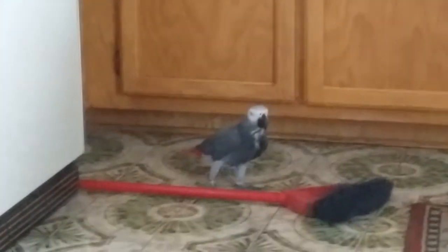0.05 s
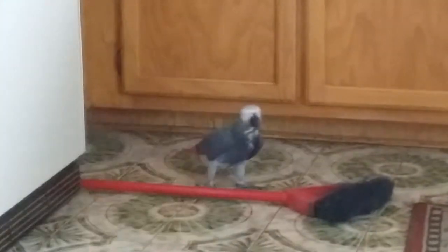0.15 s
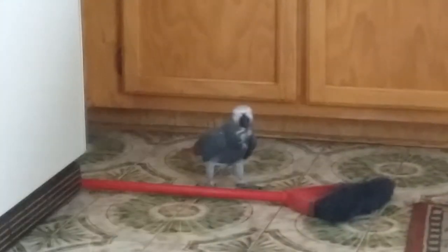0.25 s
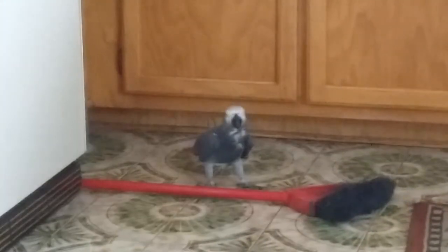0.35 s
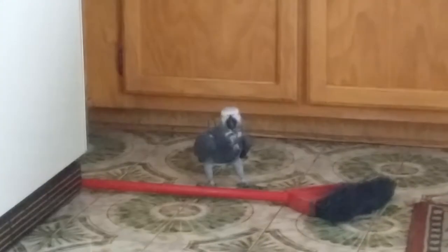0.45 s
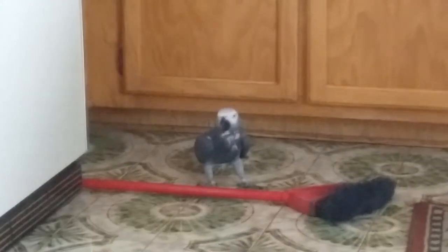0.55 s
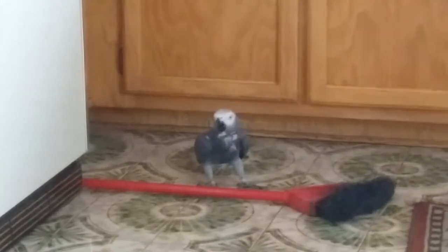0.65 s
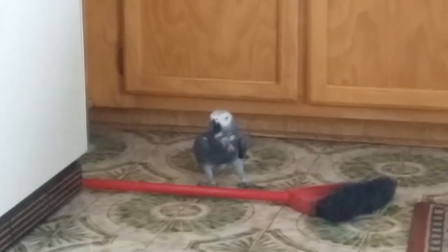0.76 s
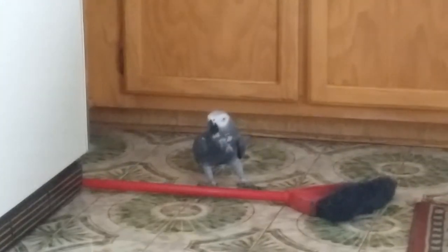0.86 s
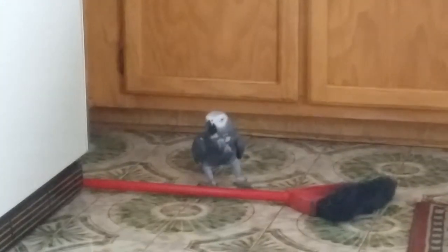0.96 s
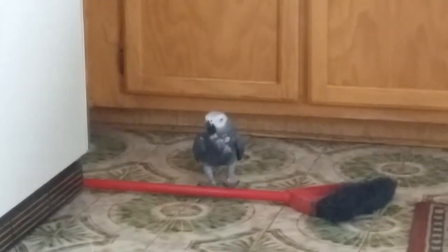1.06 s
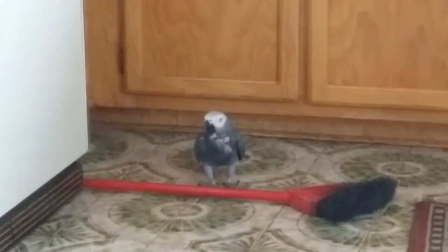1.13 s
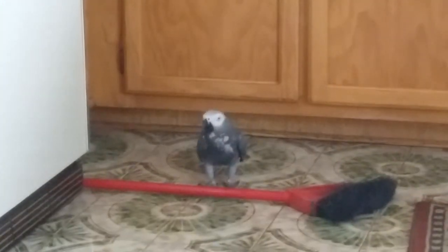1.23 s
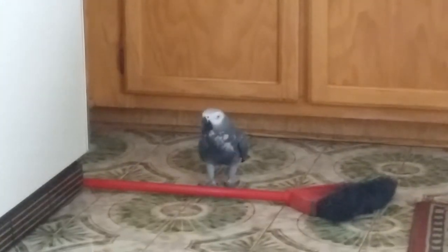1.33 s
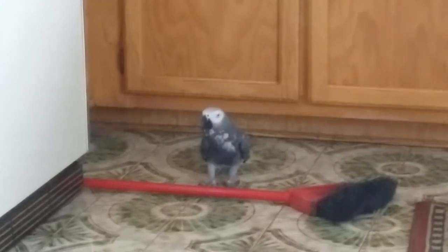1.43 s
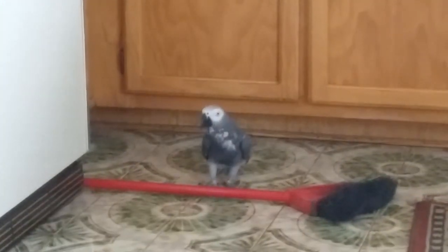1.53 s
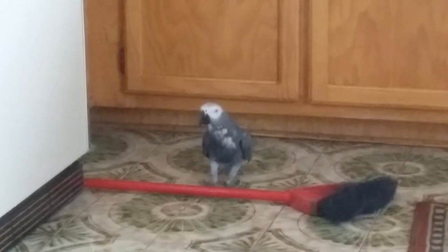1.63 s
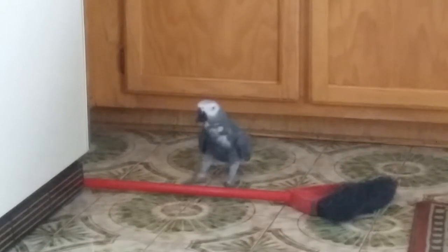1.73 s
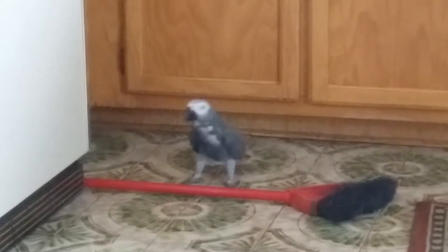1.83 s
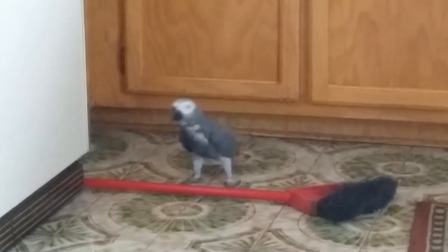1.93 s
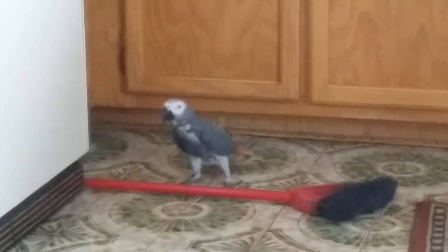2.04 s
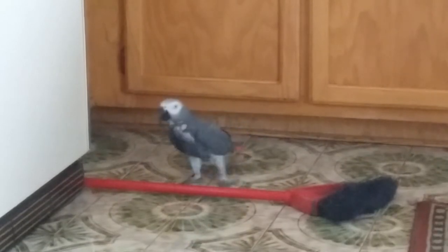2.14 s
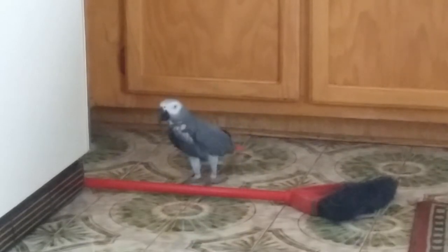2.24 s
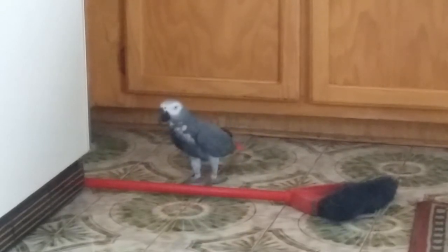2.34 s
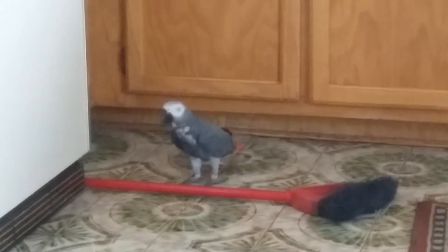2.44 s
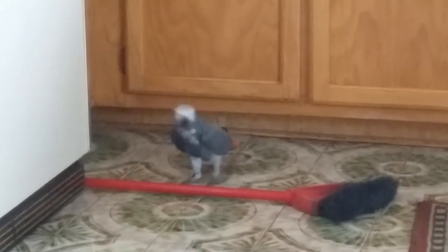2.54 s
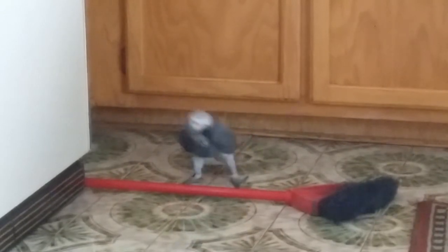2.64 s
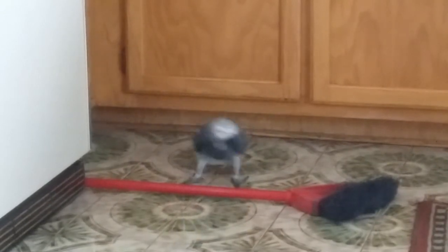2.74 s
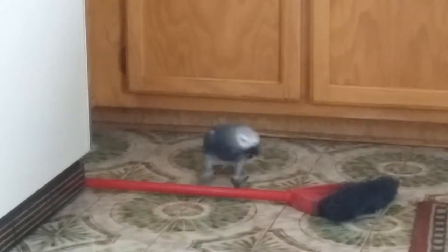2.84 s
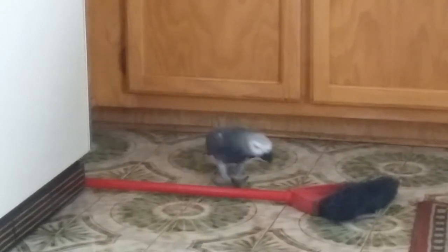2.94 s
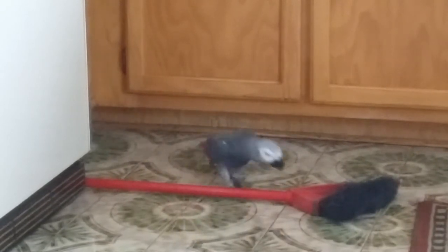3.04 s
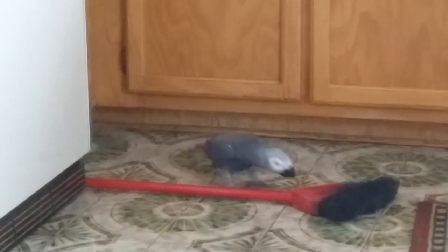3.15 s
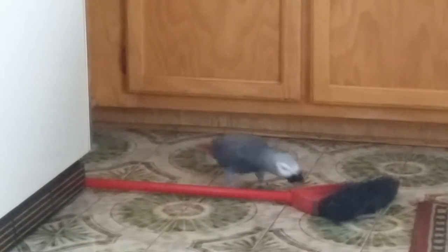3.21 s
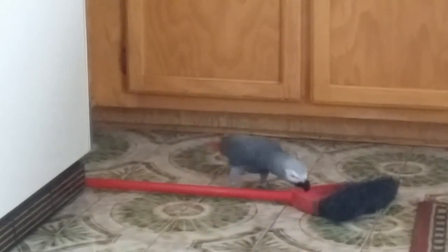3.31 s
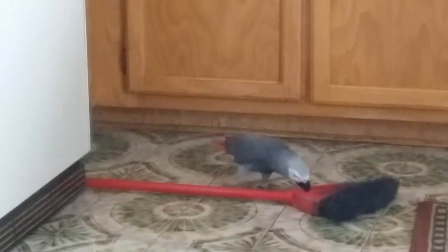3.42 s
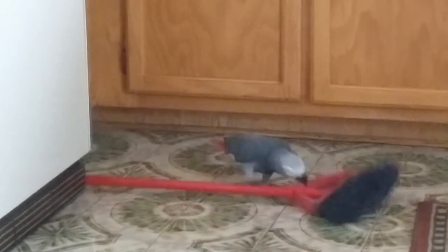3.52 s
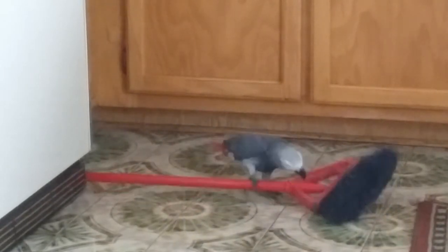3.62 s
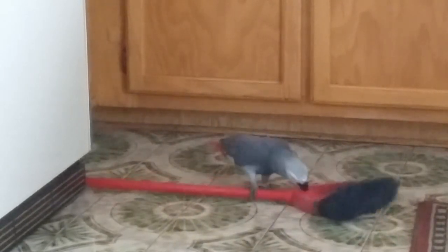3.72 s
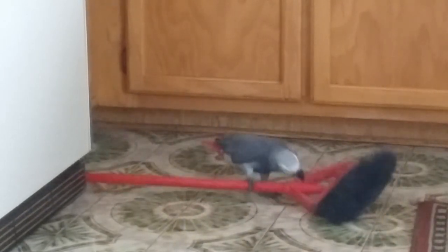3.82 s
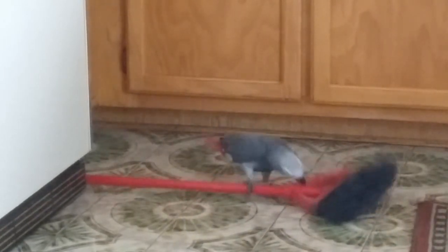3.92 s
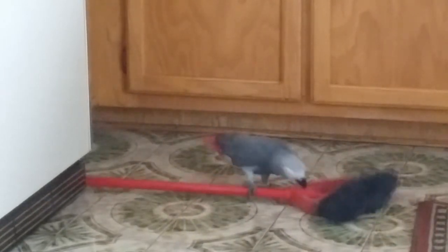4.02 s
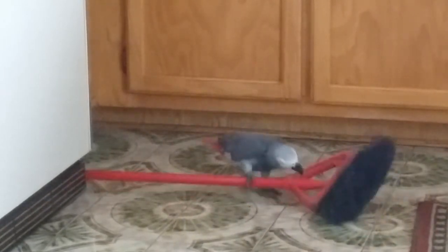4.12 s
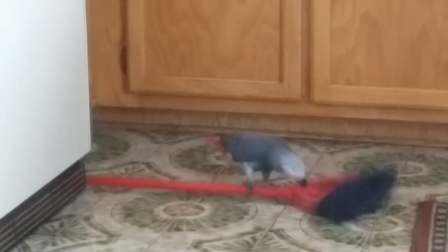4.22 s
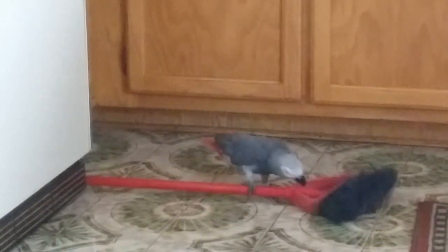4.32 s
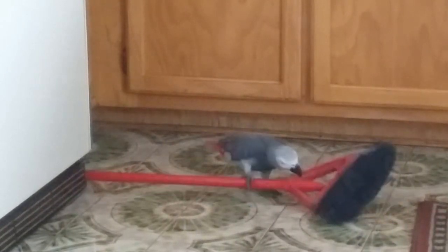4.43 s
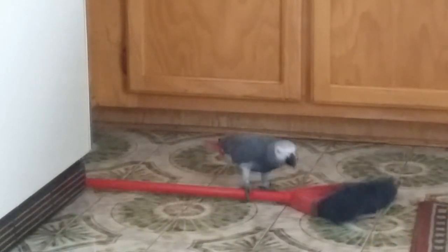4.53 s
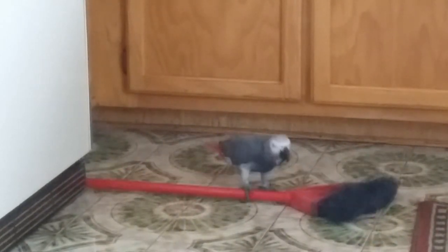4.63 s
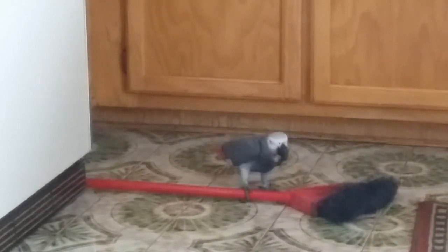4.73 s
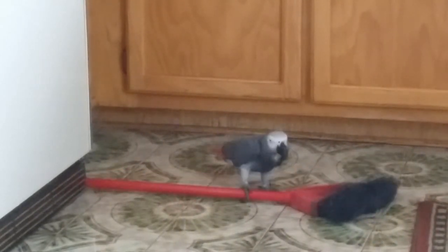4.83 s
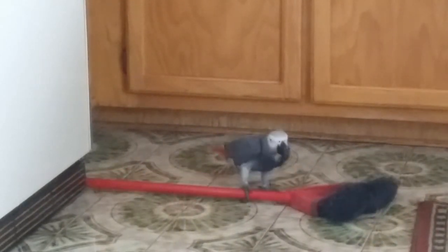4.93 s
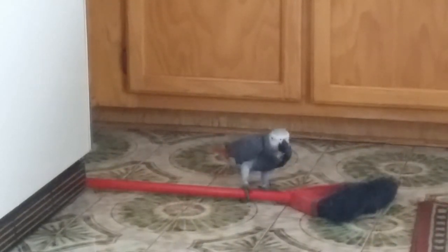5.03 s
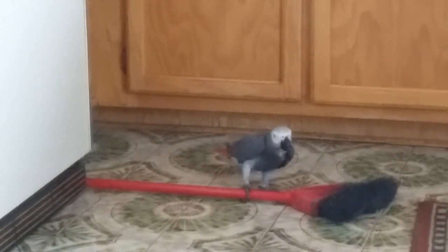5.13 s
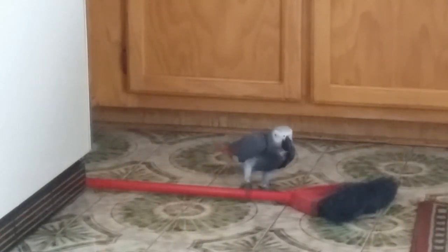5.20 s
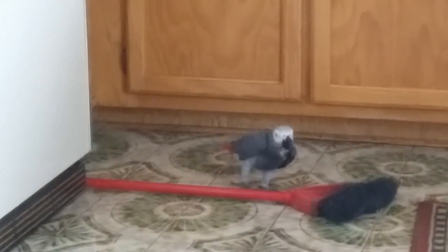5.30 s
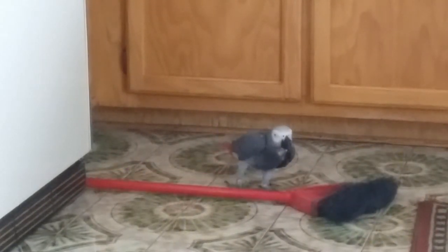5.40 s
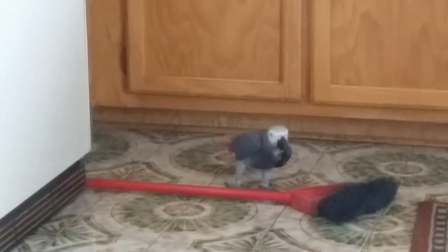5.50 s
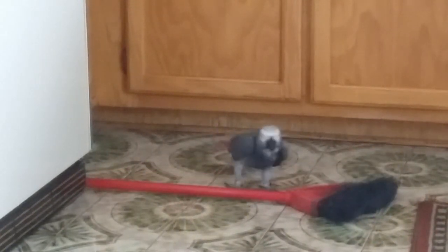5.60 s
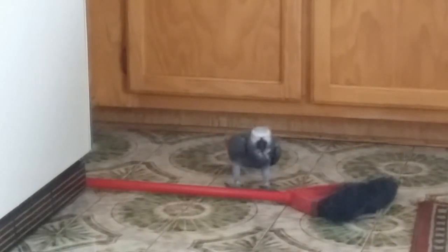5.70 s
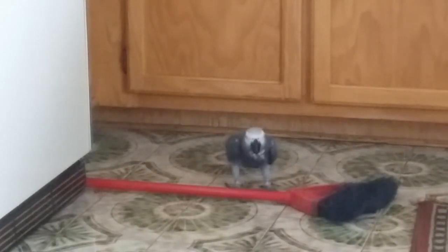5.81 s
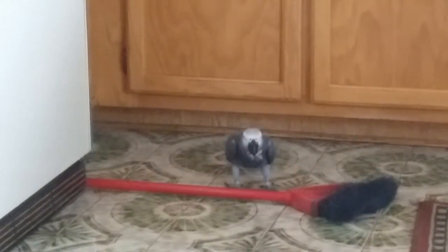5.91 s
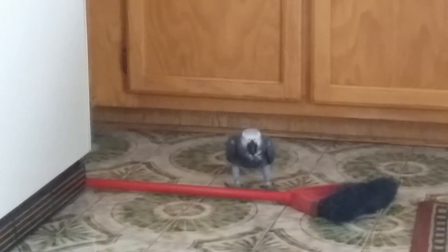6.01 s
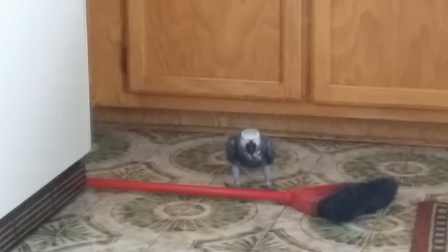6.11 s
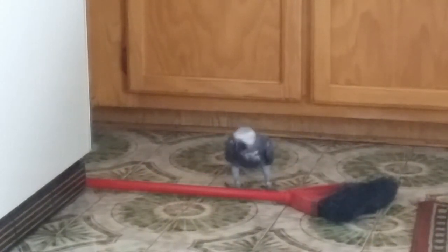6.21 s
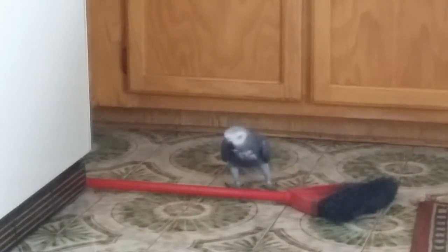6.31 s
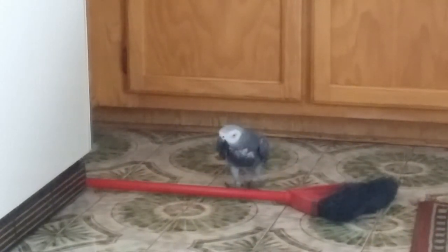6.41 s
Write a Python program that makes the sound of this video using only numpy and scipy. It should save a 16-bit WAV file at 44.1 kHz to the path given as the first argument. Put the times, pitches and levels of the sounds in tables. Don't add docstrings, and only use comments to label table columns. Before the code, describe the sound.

A refrigerator hums in an echoing kitchen while faint crockery clinks, then a parrot's beak raps five sharp, increasingly bright knocks on a broom.

```python
import sys
import numpy as np
from scipy import signal
from scipy.fft import rfft, irfft
from scipy.io import wavfile

SR = 44100
rng = np.random.default_rng(int(sys.argv[2]) if len(sys.argv) > 2 else 0)


def master_out(mix):
    frames = np.transpose(np.atleast_2d(mix))
    ceiling = np.clip(frames, -1, 1)
    pcm = np.round(ceiling * 32767).astype(np.int16)
    wavfile.write(sys.argv[1], SR, pcm)


def level_to_linear(level):
    exponent = np.asarray(level, float) / 20
    return 10 ** exponent


N = 284797

# f/Hz, level/dB per Hz
HUM = [(24, -73), (40, -17), (82, -8.5), (123, -4), (251, -4), (334, -5), (496, -16), (735, -10),
       (1040, -19.5), (1500, -20.5), (1950, -27), (3300, -120)]
# f/Hz, width/Hz, level/dB
HUM_TONES = [(118.7, 6.7, -48), (183.2, 18, -43.5), (282.6, 12, -54), (409.6, 23, -50.5)]
# f/Hz, level/dB per Hz
HISS = [(500, 5), (1200, 0), (2000, 5), (4200, -7), (6000, -6), (8000, -12.5), (11000, -10.5),
        (14500, -8.5), (16000, -54)]
# f/Hz, width/Hz, level/dB
PORT = [(6017, 847, 20), (5430, 2550, 6)]
# f/Hz, t60/s
ROOM_T60 = [(150, 0.8), (400, 0.89), (800, 0.78), (2000, 0.79), (5500, 0.81), (10000, 0.57)]
# delay/s, level/dB
EARLY = [(.0063, 15.5), (0.0192, 9), (0.0246, 9.5), (0.0271, 3), (.051, 10)]
# t/s, level/dB, centre f/Hz, length/s
CLACKS = [(1.208, -35, 7000, 0.0031), (1.335, -38.5, 5000, .006), (1.3355, -36.5, 2000, .002),
          (1.698, -38, 4900, .015), (1.941, -30.5, 6700, 0.0073), (2.0405, -18.5, 6200, 0.0028),
          (2.0424, -25.5, 2100, 0.0015), (2.0424, -19.5, 9600, 0.0021), (2.4125, -29, 8550, 0.0018),
          (2.4125, -36, 3000, 0.0014), (2.668, -29.5, 11400, .008), (2.887, -35.5, 3000, 0.0026),
          (3.609, -30, 3830, 0.049), (3.6315, -22.5, 5960, 0.0016), (3.632, -27.5, 1720, 0.0023)]
# t/s, level/dB, centre f/Hz
CHINKS = [
    (2.586, -45.5, 4670),
    (2.669, -48.5, 6360),
    (4.2, -39, 5940),
]
# f/Hz, level/dB, t60/s
BOWL = [(1548, 1.5, 0.063), (2780, -5.5, 0.037), (3213, -4.5, 0.16), (4390, -7, 0.063), (4740, -10, 0.067)]
PLATE = [(1480, -1, 0.085), (2294, -8, 0.066), (3110, -1.5, 0.035), (4630, -7, 0.024), (5000, -6.5, .045),
         (5770, -5, 0.035), (11000, -12.5, .05), (12100, -7, .05)]
CUP = [(1294, 0.5, 0.03)]
SPOON = [(12270, 0, 0.033)]
HANDLE = [(548, -1.5, 0.1), (665, 1.5, 0.026), (1380, -5, 0.011), (2470, -14, 0.017)]
JAR = [(1377, -1.5, 0.023), (3120, -9, .04), (4540, -0.5, 0.017), (5000, 0.5, .018), (7300, -6.5, 0.016),
       (11300, -10, 0.058), (12400, -11, .022)]
GLASS = [(3120, 0.0049, .012)]
ROD = [(2470, -2, 0.024), (3000, -0.46, 0.055), (3600, -3.1, 0.024), (4304, -3.4, 0.039)]
# t/s, thing
# struck, level/dB, share of the free ring time
STRIKES = [(1.335, SPOON, -65.5, 1.1), (1.61, CUP, -61, 0.74), (1.7046, BOWL, -59, 0.71),
           (1.9271, PLATE, -56.5, 0.41), (2.0424, JAR, -49.5, 0.76), (2.8904, GLASS, -59, 0.83),
           (2.8912, CUP, -60.5, .95), (3.635, HANDLE, -48.5, 0.85), (3.608, ROD, -63, .9),
           (3.632, ROD, -51.5, 0.41), (3.823, ROD, -45.5, 0.72), (4.079, ROD, -54.5, .9)]
# t/s, peak level/dB
TICKS = [(0.021, -24), (0.0357, -26), (0.0804, -30.5), (0.0899, -31), (0.1217, -31), (0.1425, -32),
         (0.1714, -18.5), (0.463, -20.5), (0.4656, -22), (0.4694, -23), (0.4766, -27)]
# t/s, contact f/Hz, crack level/dB, ring into the room level/dB, hollow body level/dB
KNOCKS = [
    (3.6247, 545, -28, -33, -58),
    (3.816, 890, -20, -16.5, -71),
    (4.0728, 1216, -21, -14, -51),
    (4.3558, 2210, -15.5, -15.5, -73),
    (4.6258, 2570, -14.5, -16, -80),
]
# f/Hz, level/dB, t60/s
BODY = [(224.5, 3.5, 0.13), (278, -24, 0.034), (480, -32, 0.036), (539, -7, 0.38), (746, -16, 0.029)]
# f/Hz, level/dB, t60/s
SHELL = [(963, 1, 0.015), (1670, -1, 0.013), (2210, 8.5, 0.0045), (2930, 4, 0.0073), (3570, -5.5, 0.0088),
         (4350, -17, 0.011)]


def rms_one(x):
    return x / np.sqrt(np.mean(x ** 2) + 1e-20)


def at_hz(points, hz):
    table_hz, values = np.array(points).T
    return np.interp(np.log(hz + 1), np.log(table_hz), values)


def resonance(x, hz, width_hz):
    r = np.exp(-np.pi * width_hz / SR)
    zeros = [(1 - r * r) / 2, 0, (r * r - 1) / 2]
    poles = [1, -2 * r * np.cos(2 * np.pi * hz / SR), r * r]
    return signal.lfilter(zeros, poles, x)


def low_pass(x, hz):
    return signal.lfilter(*signal.butter(2, min(hz, 18000), fs=SR), x)


def butter_filter(x, order, hz, kind):
    return signal.sosfilt(signal.butter(order, hz, kind, fs=SR, output="sos"), x)


def ringing(hz, t60):
    t = np.arange(int(t60 * SR * 1.2)) / SR
    return np.sin(2 * np.pi * hz * t) * level_to_linear(-60 * t / t60)


def click():
    return np.eye(1, 200)[0]


def burst(length_s):
    t = np.arange(1200) / SR
    puff = rng.standard_normal(len(t)) * level_to_linear(-40 * t / length_s)
    return puff / np.sqrt(np.sum(puff ** 2))


def add(track, s, sound):
    i = round(s * SR)
    track[i:i + len(sound)] += sound[:N - i]


def coloured(spectrum):
    hz = np.fft.rfftfreq(N, 1 / SR)
    white = rfft(rng.standard_normal(N))
    return rms_one(irfft(white * level_to_linear(at_hz(spectrum, hz)), N))


def room(x, tail_db, fill_s, gap_s, lasting):
    t = np.arange(SR) / SR
    white = rng.standard_normal((2, SR))
    edges = 70 * 2 ** np.arange(0, 8.1, .5)
    tail = 0
    for k, (low, high) in enumerate(zip(edges, edges[1:])):
        band = butter_filter(white[k % 2], 2, [low, high], "band")
        t60 = lasting * at_hz(ROOM_T60, np.sqrt(low * high))
        tail = tail + band * level_to_linear(-60 * t / t60)
    tail = tail * (1 - np.exp(-np.maximum(t - gap_s, 0) / fill_s))
    return level_to_linear(tail_db) * signal.fftconvolve(x, tail)[:N]


def hiss():
    return level_to_linear(-51.5) * coloured(HISS)


def refrigerator():
    out = level_to_linear(-42.35) * coloured(HUM)
    for hz, width_hz, level_db in HUM_TONES:
        out += level_to_linear(level_db) * rms_one(resonance(rng.standard_normal(N), hz, width_hz))
    return out


def crockery():
    touch = np.zeros(N)
    scrapes = [(s, level_db, hz, 1.16 * hz, length_s) for s, level_db, hz, length_s in CLACKS]
    scrapes += [(s, level_db, hz, 0.22 * hz, 0.01) for s, level_db, hz in CHINKS]
    for s, level_db, hz, width_hz, length_s in scrapes:
        scrape = resonance(resonance(burst(length_s), hz, width_hz), hz, width_hz)
        add(touch, s, level_to_linear(level_db) * scrape * SR / width_hz / 4)
    for s, dish, strike_db, damping in STRIKES:
        for hz, level_db, t60 in dish:
            cluster = hz * (1 + 0.0098 * rng.standard_normal(4))
            ring = sum(ringing(mode_hz, t60 * damping) for mode_hz in cluster)
            add(touch, s, level_to_linear(strike_db + level_db) * ring)
    out = level_to_linear(6.5) * touch + room(touch, tail_db=-12.5, fill_s=0.0047, gap_s=0.00053, lasting=0.81)
    add(out, .0062, level_to_linear(6) * touch)
    return out


def ticks():
    out = np.zeros(N)
    for s, peak_db in TICKS:
        add(out, s, level_to_linear(peak_db + 4.5) * low_pass(click(), 9000))
    return out - low_pass(out, 1600)


def knocks():
    contact, blows, body = np.zeros(N), np.zeros(N), np.zeros(N)
    contact_over_db = 13.5
    for s, hz, crack_db, ring_db, body_db in KNOCKS:
        dull = ringing(hz, .0065)
        dull = dull * np.minimum(np.arange(len(dull)) / 20, 1)
        add(contact, s, level_to_linear(contact_over_db) * np.hypot(level_to_linear(crack_db), level_to_linear(ring_db)) * dull)
        add(blows, s, level_to_linear(ring_db) * ringing(hz, 0.0013))
        add(blows, s, level_to_linear(crack_db) * low_pass(click(), 5200))
        for mode_hz, mode_db, t60 in SHELL:
            add(blows, s, level_to_linear(crack_db - 30 + mode_db + rng.normal(0, 2.5)) * ringing(mode_hz, t60))
        for mode_hz, mode_db, t60 in BODY:
            add(body, s, level_to_linear(body_db + mode_db + rng.normal(0, 3.3)) * ringing(mode_hz, t60))
    blows = butter_filter(blows, 3, 330, "high")
    contact = butter_filter(contact, 2, 450, "high")
    out = low_pass(low_pass(contact, 2300), 3600)

    spot = np.searchsorted([row[0] for row in KNOCKS[1:]], np.arange(N) / SR)
    for k in range(len(KNOCKS)):
        out += room((blows + body) * (spot == k), tail_db=-4, fill_s=.007, gap_s=.002, lasting=0.91)

    bright = blows - low_pass(blows, 1900)
    for delay_s, echo_db in EARLY:
        scattered = np.convolve(bright, burst(0.0076))[:N]
        add(out, delay_s, level_to_linear(echo_db) * scattered)
    return out


def scene():
    return (hiss() + refrigerator() + crockery() + ticks() + knocks())[None]


def gain_control(x):
    threshold_db, average_s, rest_db = -20.5, 0.39, -0.83
    sink_db_per_s, recover_s = 7.5, 0.28
    hop = 100
    r = np.exp(-1 / (average_s * SR))
    power = signal.lfilter([1 - r], [1, -r], x[0] ** 2)[::hop]
    level_db = 10 * np.log10(power + 1e-12)
    loud = .5 + .5 * np.tanh(2 * (level_db - threshold_db))
    gain_db = np.zeros(len(loud))
    for i in range(1, len(loud)):
        sinking = loud[i] * sink_db_per_s
        recovering = (1 - loud[i]) * gain_db[i - 1] / recover_s
        gain_db[i] = gain_db[i - 1] - hop / SR * (sinking + recovering)
    return level_to_linear(rest_db + np.interp(np.arange(N) / hop, np.arange(len(loud)), gain_db))


def top_cut(x):
    return signal.sosfilt(signal.butter(12, 14860, fs=SR, output="sos"), x)


def record(dry):
    dry = butter_filter(dry, 2, 54, "high")
    x = dry + sum(level_to_linear(level_db) * resonance(dry, hz, width_hz) for hz, width_hz, level_db in PORT)
    x = x * gain_control(x)
    mix = .95 * np.tanh(x / .95)
    return top_cut(mix)


dry = scene()
out = record(dry)
master_out(out)
```